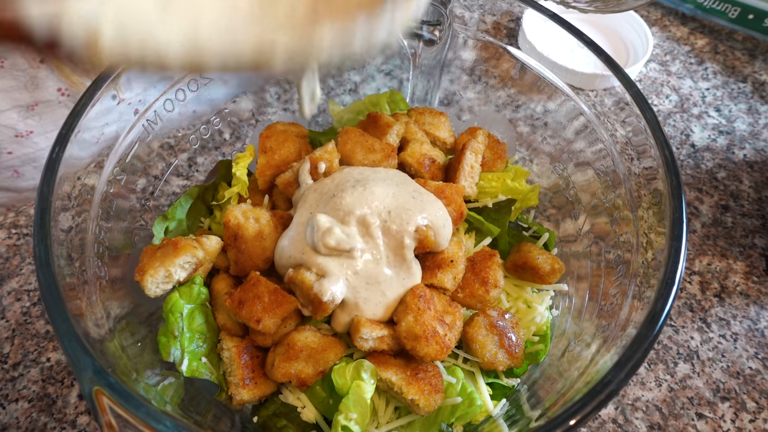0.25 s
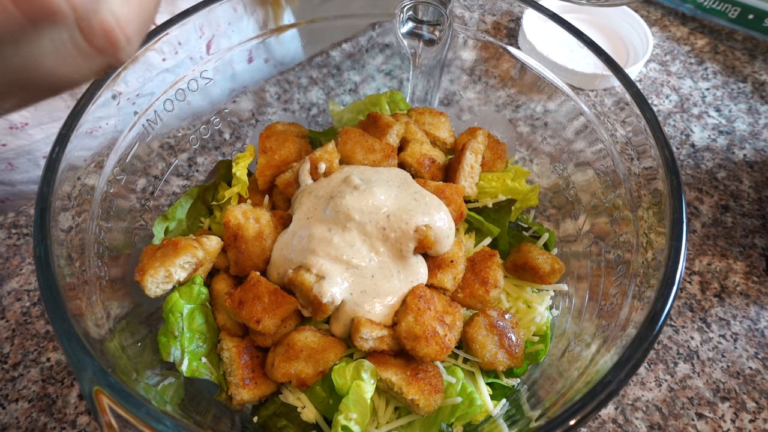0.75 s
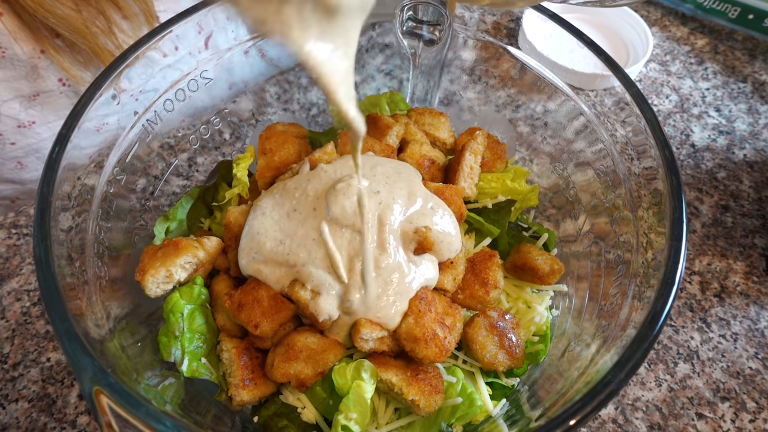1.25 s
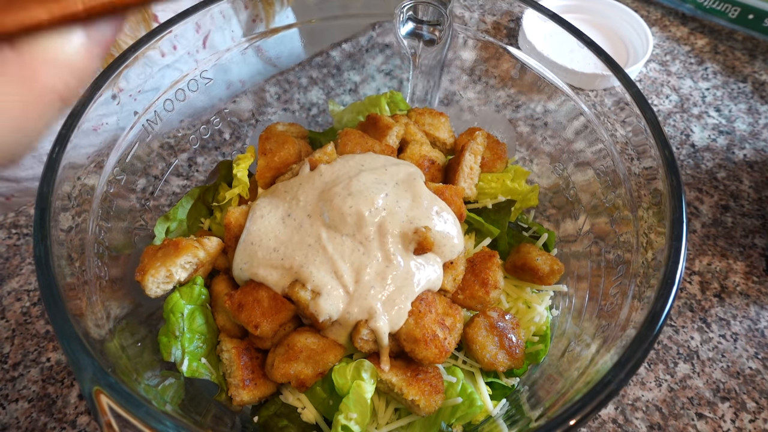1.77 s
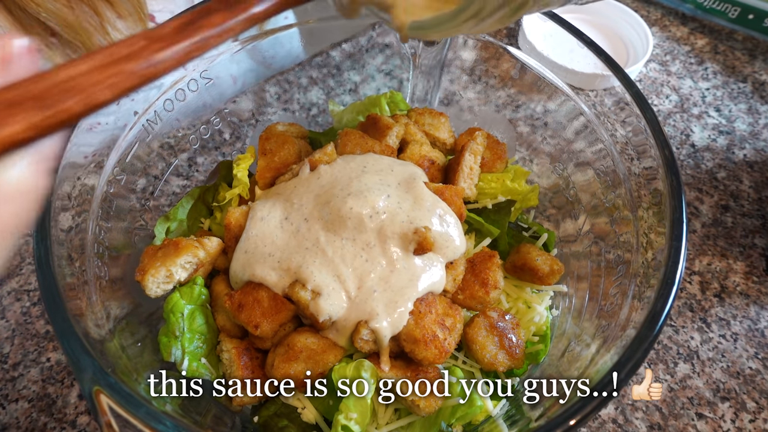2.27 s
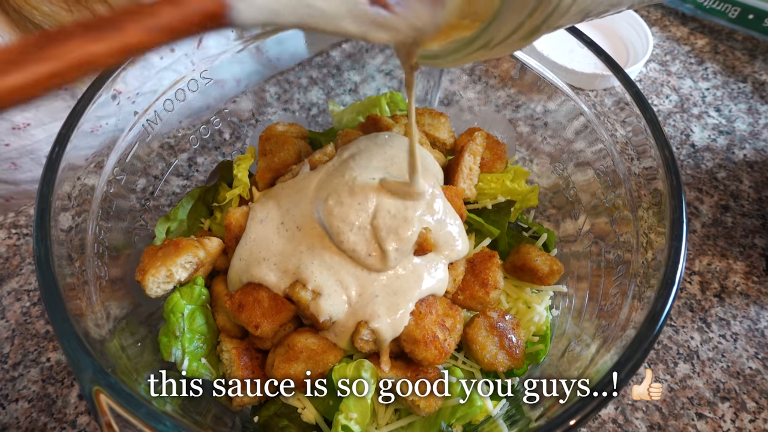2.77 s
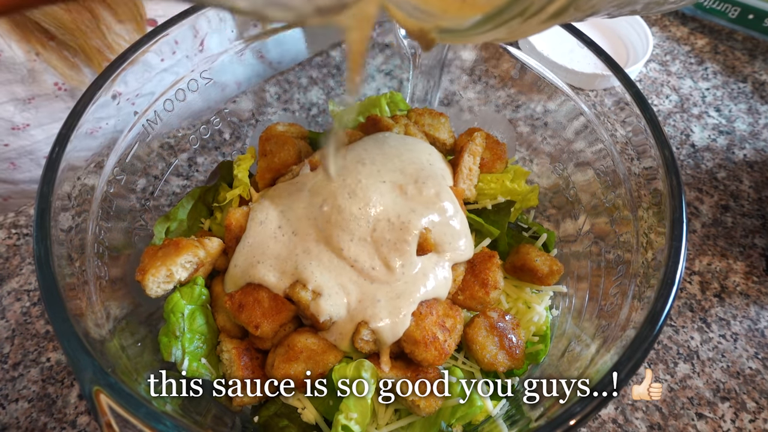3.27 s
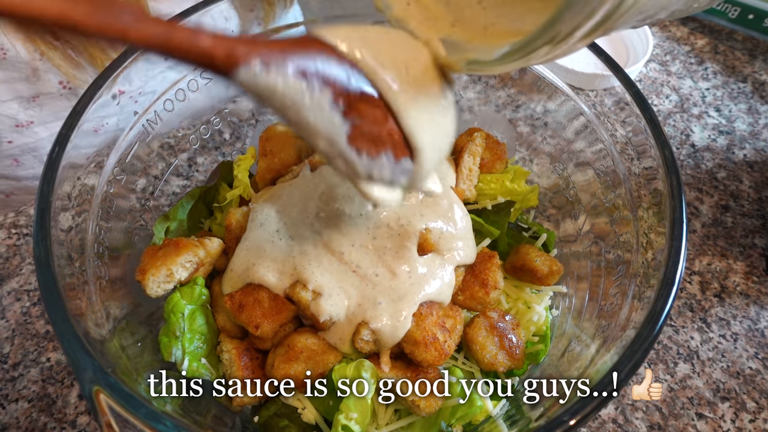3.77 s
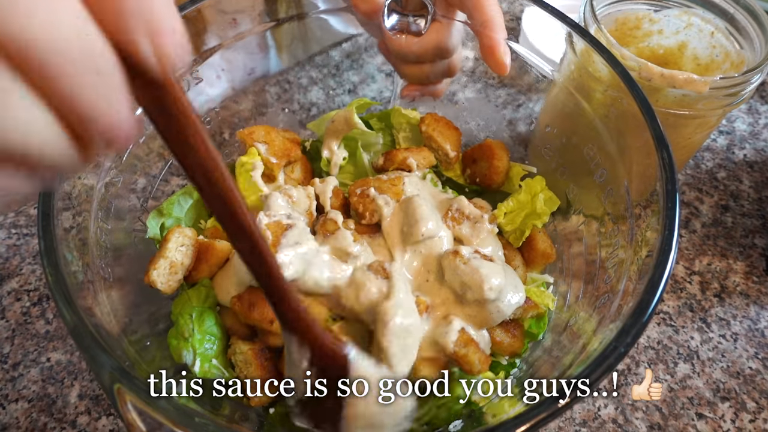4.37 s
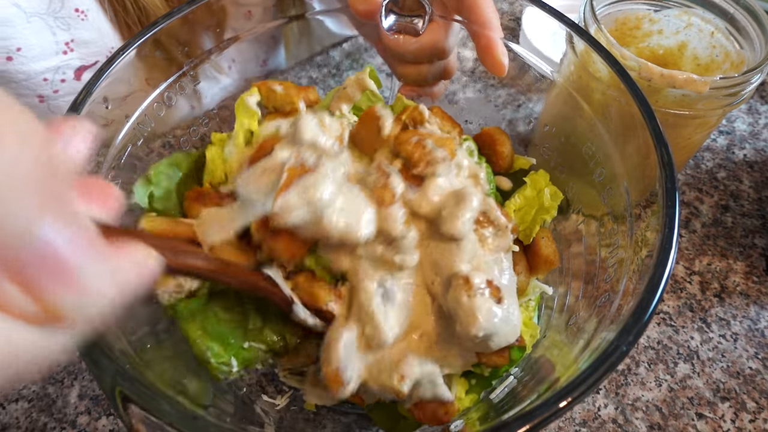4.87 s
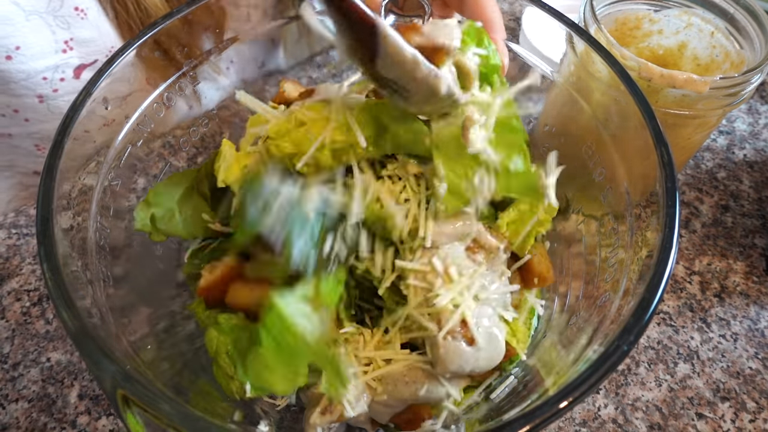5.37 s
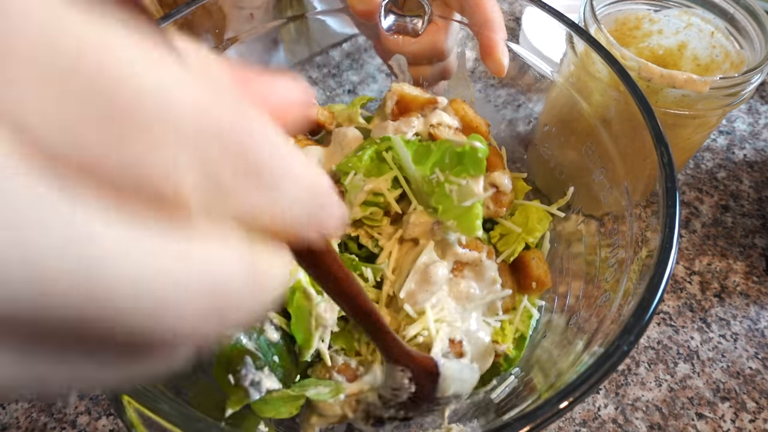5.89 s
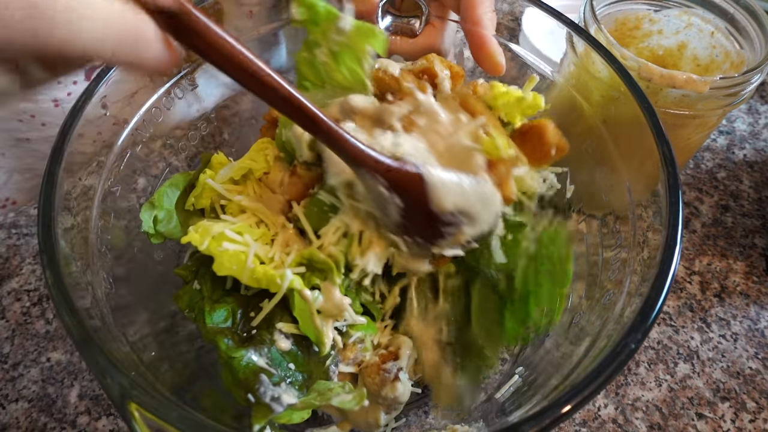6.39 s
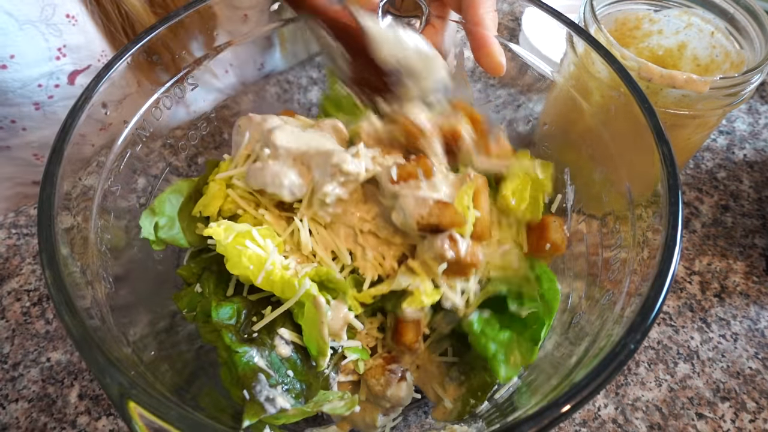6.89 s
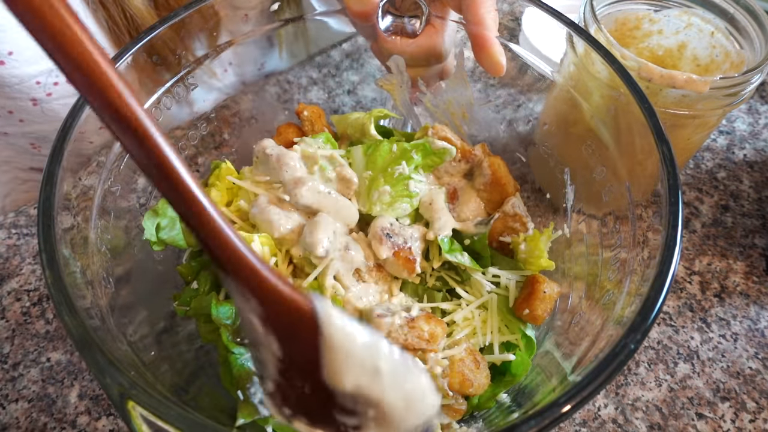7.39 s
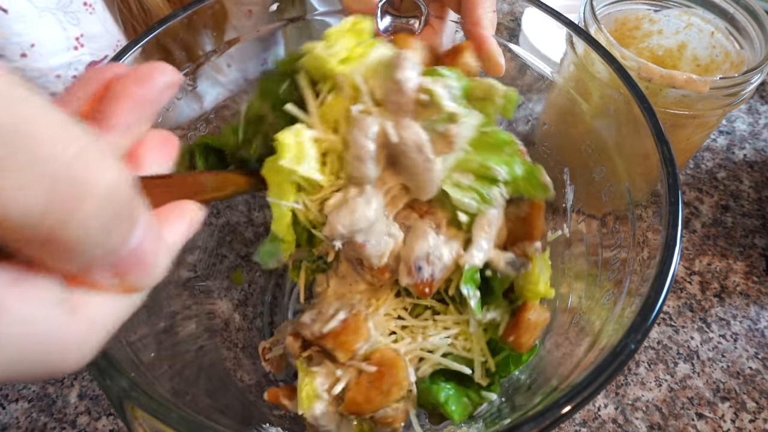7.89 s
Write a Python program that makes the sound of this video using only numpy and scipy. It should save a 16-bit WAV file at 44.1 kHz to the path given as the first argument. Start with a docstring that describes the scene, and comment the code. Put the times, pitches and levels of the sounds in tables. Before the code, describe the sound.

A wooden spoon taps and scrapes a jar over a soft fan hum, then crisp lettuce and croutons are tossed crunchily in a glass bowl.

```python
"""A small kitchen with a humming fan, heard in stereo from just above a glass salad bowl.
A wooden spoon knocks on the rim, taps and scrapes dressing out of a jar, then tosses lettuce and croutons.
Leaves are dense ringing grains, snaps and smacks are bursts of tiny cracks, wet squeaks are rough chirps.
Knocks, taps and the rim are decaying modes; the fan is coloured noise with hums and narrow hiss bands."""
import sys
import numpy as np
from scipy import signal
from scipy.fft import rfft, irfft
from scipy.io import wavfile

SR = 44100
rng = np.random.default_rng(int(sys.argv[2]) if len(sys.argv) > 2 else 0)


def int16_out(signal):
    """Quantize to a 16-bit WAV file."""
    q = np.round(np.clip(np.atleast_2d(signal).T, -1, 1) * 32767)
    wavfile.write(sys.argv[1], SR, q.astype(np.int16))


N = 358974

# colour of cracking ribs, crust and wet films: f/Hz, level/dB
CRACK_COLOUR = [(100, -20), (400, 8), (4000, 1), (8200, 1.5), (9500, -4), (15500, -13)]
# a gesture starts this far below its top; a stopped spoon or finger dies away this fast
SWELL_DB, STOP_DB_PER_S = 10, 403


def salad(click_db=-8):
    """Dressed leaves rub and crackle among tiny clicks; they catch and let go, so the grains come in clumps."""
    # dull rubbing of leaf on leaf: f/Hz, level/dB
    rub_colour = [(60, -55), (200, -6.5), (400, -16), (560, -2.5), (900, 1.5), (1200, -4.5), (1750, -2),
                  (2400, -6.5), (3500, -6.5), (6000, -25), (15000, -38)]
    # bright crackle of crisp leaves: f/Hz, level/dB
    crisp_colour = [(200, -54), (1200, -16.5), (2200, 3.5), (3200, 4.5), (4800, 5), (6200, 1.5), (7900, -2),
                    (9200, -8.5), (12000, -16.5), (15500, -30)]
    clumps = undb(2 * walk(110) + 1.1 * walk(35))
    clicks = level(pops(1500, 1.3), click_db)
    rub_grains = crackle(rate=4800, spread_db=3.5, cycles=4.2, patchy_db=2.5)
    rub = colour(rub_grains + clicks, rub_colour) * undb(0.69 * walk(170))
    crisp_grains = crackle(rate=7000, spread_db=2.5, cycles=8.9, patchy_db=4.5)
    crisp = colour(crisp_grains + clicks, crisp_colour)
    rubbing = level(rub * clumps, 3.86) * tossing(axis=0)
    return rubbing + level(crisp * clumps, 3.44) * tossing(axis=1)


def tossing(axis):
    """Gain of the rubbing (axis 0) or the crisp crackle (axis 1) as the spoon pushes and the leaves fall back."""
    # spoon pushing through the salad: t/s, length/s, swell/s, rubbing gain/dB, crackle gain/dB
    strokes = [(3.961, 0.076, .03, -41, -40), (4.039, .15, .02, -45, -45), (4.413, .11, 0.08, -33.5, -35.5),
               (4.538, .08, .02, -44, -41), (4.643, 0.091, 0.018, -33.5, -34),
               (4.976, 0.03, 0.021, -35, -38.5), (5.443, 0.19, 0.06, -37, -41),
               (5.913, 0.057, 0.013, -39.5, -38), (6.036, 0.11, 0.068, -35.5, -40),
               (6.912, 0.28, 0.038, -38.5, -40.5), (7.496, .15, 0.044, -43, -41),
               (7.68, 0.086, .04, -34.5, -36.5), (7.815, 0.067, 0.022, -37, -38.5)]
    # lifted leaves tumbling back: t/s, length/s, rubbing gain/dB, crackle gain/dB, settling/dB per s
    tumbles = [(4.186, .02, -61, -53.5, 64), (4.763, 0.39, -44.5, -48.5, 30),
               (5.653, 0.056, -58, -53.5, 174), (5.963, .06, -52, -55, 60), (6.149, .09, -40.5, -45, 26.5),
               (7.187, 0.04, -50, -51.5, 51), (7.746, 0.05, -37.5, -40.5, 64),
               (7.88, 0.035, -43, -45.5, 24)]
    tumble_swell_s = 0.041
    pushes = [(s, length, swell_s, dbs[axis], STOP_DB_PER_S) for s, length, swell_s, *dbs in strokes]
    falls = [(s, length, tumble_swell_s, dbs[axis], settling) for s, length, *dbs, settling in tumbles]
    return gates(pushes + falls)


def crumbs(rate=45, spread_db=2.8, snap_hz=2800, snap_db=-4):
    """Lesser ribs and crusts snap at random (rate per s) for as long as the salad moves."""
    snaps = signal.fftconvolve(pops(rate, spread_db), crack(.02, decay_s=0.0013))[:N]
    return level(resonate(snaps, snap_hz, snap_hz * 2), snap_db) * tossing(axis=1)


def rib_snaps():
    """Leaf ribs, crust and sticky dressing give way in sharp runs of tiny fractures."""
    # snaps close to the microphone: t/s, peak level/dB, centre f/Hz, length scale/s
    snaps = [(0.688, -20.5, 4900, 0.0034), (4.167, -20, 4440, 0.019), (4.414, -27.5, 2960, 0.00063),
             (4.517, -14, 3150, 0.0077), (4.534, -19, 4120, 0.0025), (4.596, -24, 4530, 0.0016),
             (4.855, -18, 1990, .0047), (5.46, -18, 3030, 0.0021), (5.509, -11.5, 5430, .0043),
             (5.538, -13, 3070, .019), (5.646, -16.5, 2580, 0.0042), (5.844, -23, 4350, 0.0055),
             (5.916, -20.5, 3850, 0.0052), (5.93, -14, 4050, 0.011), (6.322, -23.5, 2560, 0.0099),
             (6.398, -21, 2780, 0.0074), (6.695, -26.5, 3900, 0.0058), (6.921, -15.5, 4850, 0.003),
             (7.01, -8, 4640, 0.0032), (7.021, -9.5, 5300, 0.0063), (7.17, -32, 3070, .012),
             (7.192, -16.5, 3580, 0.005), (7.489, -25, 5040, 0.01), (7.564, -23, 4050, 0.016),
             (7.752, -7.5, 3260, 0.0024), (8.116, -24.5, 3850, 0.0074)]
    return bursts(snaps, breadth=0.95, decay_share=0.51)


def squeaks(rasp=0.15):
    """A wet leaf slips on the glass by very fast stick-slip: a rough chirp that rises as the leaf lets go."""
    # slips, ahead of their colouring: t/s, peak level/dB, length/s
    slips = [(4.661, -24, .007), (4.67, -29, .004), (5.534, -23, 0.0065), (5.547, -22, 0.0067),
             (7.018, -17, 0.0045), (7.04, -20.5, 0.0038), (7.546, -8, 0.002)]
    start_hz, end_hz = 6220, 8440
    out = np.zeros(N)
    for s, db, length in slips:
        size = int(length * SR)
        roughness = 1 + rasp * rng.standard_normal(size)
        hz = np.linspace(start_hz, end_hz, size) * roughness
        chirp = np.sin(2 * np.pi * np.cumsum(hz) / SR)
        add(out, s, chirp * signal.windows.tukey(size), db)
    return colour(out, CRACK_COLOUR)


def knocks(click_db=-14):
    """Croutons and spoon knock drily on the bowl, damped at once by the salad lying on the glass."""
    # knocks in the bowl: t/s, peak level/dB of the first blow, number of blows
    blows = [(3.996, -25, 1), (4.018, -19, 3), (4.566, -14.5, 1), (4.577, -15.5, 1), (4.682, -17.5, 3),
             (4.751, -16, 1), (4.802, -19.5, 1), (5.028, -24.5, 1), (5.254, -26, 1), (5.311, -26.5, 1),
             (6.076, -18.5, 1), (6.153, -20.5, 1), (6.468, -24.5, 1), (6.514, -30, 1), (6.576, -25, 1),
             (6.983, -17, 1), (7.072, -18.5, 1), (7.819, -12.5, 3), (7.840, -10, 4), (7.887, -19.5, 1)]
    # loaded bowl, before each blow scatters it: f/Hz, level/dB, t60/s
    bowl_modes = [(600, -11.5, 0.018), (806, -3, 0.021), (903, -2, 0.024), (1497, -2, 0.016),
                  (1720, -1.5, 0.021), (2610, -3.5, 0.0081), (3705, -4.5, 0.013), (4730, -2.5, 0.0021)]
    # a catching spoon skips on at this interval, each blow a little weaker
    skip_s, skip_db = .0062, -1.75
    out = np.zeros(N)
    for start, first_db, count in blows:
        for k in range(round(count)):
            s, db = start + k * skip_s, first_db + k * skip_db
            add(out, s, ring(bowl_modes, .05, scatter=0.093), db)
            add(out, s, crack(.03, decay_s=0.00047), db + click_db)
    return out


def jar():
    """Taps and juddering scrapes ring the same short modes; dressing hisses under the spoon."""
    # spoon on the jar: t/s, peak level/dB, contact hardness/dB (mode tilt per decade and crack gain)
    taps = [(1.816, -35.5, -12), (2.214, -27.5, -35), (2.247, -33, -35), (2.427, -33, 12), (2.536, -31, -5),
            (2.555, -23, -1), (2.575, -24, 14), (2.859, -22.5, -1.5), (3.081, -23, 8), (3.092, -15.5, -12),
            (3.098, -19, -7), (3.112, -29, 11), (3.401, -22, -4.5), (3.501, -16, -20), (3.516, -23, 11),
            (3.526, -18, 4), (3.740, -11.5, 16.5)]
    # spoon and hand-held jar, before each blow scatters them: f/Hz, level/dB, t60/s
    jar_modes = [(741, 0, 0.013), (792.5, -1, 0.023), (1959, -10, 0.019), (2040, -9, 0.021),
                 (3130, -18.5, 0.0048), (4480, -23.5, 0.022), (4900, -21.5, 0.0086), (6770, -29, 0.0075)]
    # wet hiss of smeared dressing: f/Hz, level/dB
    smear_colour = [(1000, -34), (1800, 5.5), (2500, 0.5), (3400, 4.5), (4200, 0), (5700, -2.5),
                    (7500, -10), (10000, -19.5), (15500, -45)]
    out = np.zeros(N)
    for s, db, hard_db in taps:
        add(out, s, ring(jar_modes, .08, scatter=0.031, tilt_db=hard_db), db)
        add(out, s, crack(.03, decay_s=0.0026), db - 27 + hard_db)
    soft_blow = ring(jar_modes, .08, scatter=.005, tilt_db=-9)
    judder = signal.fftconvolve(pops(900, 3.5), soft_blow)[:N]
    wet_grains = crackle(rate=8000, spread_db=-1.5, cycles=23, patchy_db=3)
    smear = colour(wet_grains, smear_colour) * undb(2.8 * walk(100))
    return out + level(judder, 3.8) * scraping(axis=0) + level(smear, 2.2) * scraping(axis=1)


def scraping(axis):
    """Gain of the judder (axis 0) or the wet hiss (axis 1) while the spoon drags along the jar."""
    # drags along the jar: t/s, length/s, swell/s, glass judder gain/dB, wet hiss gain/dB
    scrapes = [(2.37, 0.16, 0.13, -55, -57.5), (2.931, .15, 0.087, -52, -50),
               (3.454, 0.062, 0.038, -43, -51), (3.736, 0.13, 0.015, -39.5, -47.5)]
    return gates([(s, length, swell_s, dbs[axis], STOP_DB_PER_S) for s, length, swell_s, *dbs in scrapes])


def rim(rattle_db=-10, rattle_hz=520, rattle_decay_s=0.092):
    """Wood on the rim: a dull thud, then the glass sings on and its foot chatters on the counter."""
    # spoon on the rim: t/s, ring peak level/dB, thud peak level/dB
    rim_hits = [(0.0, -23, -42), (1.542, -32.5, -10.5)]
    # free rim, before each blow scatters it: f/Hz, level/dB, t60/s
    rim_modes = [(634, -3, 0.52), (686.5, 2.5, 0.51), (1535, 1, 0.64), (2660, -11, 0.34), (3160, -23, 0.41),
                 (4070, -25, .3)]
    # spoon and counter under a rim hit, before scatter: f/Hz, level/dB, t60/s
    thud_modes = [(300, -14.5, 0.081), (435, -5.5, 0.071), (630, -3.5, 0.036), (763, 4, 0.041),
                  (930, -1, 0.012), (2070, -12, 0.025), (3210, -35.5, 0.23), (5100, -15, 0.0035)]
    out = np.zeros(N)
    for s, ring_db, thud_db in rim_hits:
        add(out, s, ring(rim_modes, .7, scatter=0.0001), ring_db)
        add(out, s, ring(thud_modes, .15, scatter=0.0287), thud_db)
        chatter = resonate(crack(0.3, rattle_decay_s), rattle_hz, rattle_hz)
        add(out, s, chatter, ring_db + rattle_db)
    return out


def smacks():
    """Dressing smacks under the spoon and hands bump the bowl, each as a run of tiny cracks."""
    # smacks and bumps: t/s, peak level/dB, centre f/Hz, length scale/s
    smack_table = [(0.702, -39, 3500, .004), (0.75, -48.5, 3900, 0.11), (1.655, -35, 3100, 0.0035),
                   (1.71, -43.5, 2430, 0.073), (2.520, -35.5, 2100, 0.022), (2.554, -25.5, 1620, 0.01),
                   (2.575, -30, 2460, .0042), (2.968, -39, 3370, 0.0059), (3.094, -22.5, 3000, 0.0082),
                   (3.503, -19, 3320, 0.0037), (5.846, -40, 690, 0.035), (7.446, -34, 407, 0.017)]
    return bursts(smack_table, breadth=0.6, decay_share=0.9)


def fingers(hz=5400, width_hz=700):
    """Skin sliding along the smooth wooden spoon handle gives a soft, narrow hiss."""
    # slides along the handle: t/s, length/s, swell/s, level/dB
    slides = [(0.925, .42, .02, -70.5), (7.27, 0.23, 0.21, -50.5)]
    hiss = resonate(resonate(rng.standard_normal(N), hz, width_hz), hz, width_hz)
    return level(hiss) * gates([(*slide, STOP_DB_PER_S) for slide in slides])


def room(x, treble_hz=4000, alike=0.28, t60_s=0.4):
    """Counter and walls return a short, dull tail, partly unrelated between the sides."""
    t = seconds(.5)
    # the first return comes 3 ms after the direct sound
    tails = rng.standard_normal((3, len(t))) * undb(-60 * t / t60_s) * (t > .003)
    tails = signal.lfilter(*signal.butter(1, min(treble_hz, SR / 3), fs=SR), tails)
    pair = tails[:2] + 2 * alike * tails[2]
    return np.array([signal.fftconvolve(x, h / np.linalg.norm(h))[:N] for h in pair])


def kitchen(air_db=-52.5):
    """Steady fan air as coloured noise with its hum and whine, spread around the room."""
    # fan air in the room: f/Hz, level/dB
    air_colour = [(18, -74), (30, -48), (43, -28.5), (124, -15), (189, -7), (239, -10.5), (273, -5),
                  (336, -17), (540, -14.5), (913, -23), (1430, -21), (2680, -28.5), (5310, -39.5),
                  (6210, -42), (16000, -50)]
    # air diffuse in the mids, alike on both sides in the bass: f/Hz, side minus mid level/dB
    air_spread = [(60, -19), (260, -15), (430, -9), (900, -2), (1900, -1), (3000, -3.5), (7000, 0),
                  (10500, -2), (15000, -14)]
    # hiss bands of the fan motor: f/Hz, width/Hz, rms level/dB
    motor_bands = [(4750, 570, -73.5), (7630, 130, -83.5), (9300, 250, -83.5)]
    # low hum and fan-blade hum: f/Hz, rms level/dB, wobble/dB
    hum_tones = [(58, -86, 0), (277.4, -58, 3.5)]
    mid, side = (level(colour(rng.standard_normal(N), air_colour), air_db) for _ in range(2))
    whine = np.zeros(N)
    for hz, width, db in motor_bands:
        band = resonate(resonate(rng.standard_normal(N), hz, width), hz, width)
        whine += level(band, db)
    t = np.arange(N) / SR
    hum = np.zeros(N)
    for hz, db, wobble_db in hum_tones:
        tone = np.sin(2 * np.pi * hz * t + .5 * walk(5.7))
        hum += level(tone * undb(wobble_db * walk(5.7)), db)
    return mid + whine + hum + colour(side, air_spread) * np.array([[1], [-1]])


def undb(db):
    """Decibels to gain."""
    return 10 ** (np.asarray(db) / 20)


def level(x, db=0):
    """Scale to an rms level."""
    return x * undb(db) / np.sqrt(np.mean(x ** 2))


def add(out, s, x, db):
    """Mix a short sound in at time s with the given peak level."""
    i = max(int(s * SR), 0)
    out[i:i + len(x)] += (x * undb(db) / np.abs(x).max())[:N - i]


def seconds(length):
    """Time axis of a short sound."""
    return np.arange(int(length * SR)) / SR


def colour(x, points):
    """Causal filter through (Hz, dB) points, built from the cepstrum."""
    hz, db = np.transpose(points)
    size = 4096
    grid_hz = np.fft.rfftfreq(size, 1 / SR) + 1
    gain = undb(np.interp(np.log(grid_hz), np.log(hz), db))
    cepstrum = irfft(np.log(gain))
    # folding the cepstrum forward in time gives minimum phase
    cepstrum[1:size // 2] *= 2
    cepstrum[size // 2 + 1:] = 0
    return signal.fftconvolve(x, irfft(np.exp(rfft(cepstrum))))[:len(x)]


def resonate(x, hz, width):
    """Two-pole band-pass."""
    hz = min(hz, .45 * SR)
    return signal.lfilter(*signal.iirpeak(hz, hz / min(width, SR / 4), fs=SR), x)


def walk(rate):
    """Smooth random wander through knots of unit spread, rate knots per second."""
    knots = rng.standard_normal(N // 10)
    return np.interp(np.arange(N) / SR * rate, np.arange(len(knots)), knots)


def gates(gestures):
    """Gain of gestures (s, length s, swell s, dB, fall dB per s): each swells, holds and dies away."""
    t = np.arange(N) / SR
    power = np.zeros(N)
    for s, length, swell_s, db, fall_db_per_s in gestures:
        age = t[t >= s] - s
        swell_db = SWELL_DB * np.maximum(1 - age / swell_s, 0)
        fall_db = fall_db_per_s * np.maximum(age - length, 0)
        power[t >= s] += undb(db - swell_db - fall_db) ** 2
    return np.sqrt(power)


def ring(modes, length, scatter, tilt_db=0):
    """Decaying modes; each blow lands elsewhere and shifts them, a hard one favours the high ones (dB per decade)."""
    t = seconds(length)
    chance = rng.standard_normal((len(modes), 2))
    out = np.zeros(len(t))
    for k, (hz, db, t60) in enumerate(modes):
        gain = (-1) ** k * undb(db + tilt_db * np.log10(hz) + chance[k, 0])
        shifted_hz = hz * (1 + scatter * chance[k, 1])
        out += gain * undb(-60 * t / t60) * np.sin(2 * np.pi * shifted_hz * t)
    return out


def crack(length, decay_s, rise_s=.0001):
    """A burst of tiny fractures that builds up and dies away."""
    t = seconds(length)
    envelope = np.exp(-t / decay_s) * np.tanh(t / rise_s)
    return colour(rng.standard_normal(len(t)) * envelope, CRACK_COLOUR)


def bursts(table, breadth, decay_share, rise_share=0.27):
    """A rib breaks or a wet film parts: a short run of tiny cracks around one pitch."""
    out = np.zeros(N)
    for s, db, hz, length in table:
        cracks = crack(0.26, length * decay_share, length * rise_share)
        add(out, s, resonate(resonate(cracks, hz, hz * breadth), hz, hz * 2), db)
    return out


def pops(rate, spread_db):
    """Random impulses of either sign, rate per second, with exponentially spread levels in dB."""
    draw = rng.random(N) * SR / rate
    hits = np.flatnonzero(draw < 1)
    out = np.zeros(N)
    out[hits] = (-1.) ** hits * undb(spread_db * np.minimum(-np.log(draw[hits]), 4))
    return out


def crackle(rate, spread_db, cycles, patchy_db):
    """Grains that ring a few cycles; the level of each pitch comes and goes on its own."""
    pitches = np.geomspace(350, 15000, 32)
    out = np.zeros(N)
    for hz in pitches:
        grains = pops(rate / len(pitches), spread_db) * undb(patchy_db * walk(45))
        out += resonate(grains, hz, hz / cycles)
    return level(out)


def small_body(x, corner_hz):
    """Small things radiate little below their first mode."""
    return signal.sosfilt(signal.butter(2, corner_hz, "high", fs=SR, output="sos"), x)


def scene(near_db=-0.14, bowl_db=-22, room_db=-20):
    """Bowl and jar sit close, a little to the right; the curved glass throws the crackle unevenly to the two sides."""
    # left microphone facing away from the bowl: f/Hz, level/dB
    left_shade = [(60, 0), (250, -.3), (420, -2.5), (650, -1.7), (1300, -3.1), (2400, -1.8), (3800, -3.3),
                  (6500, -3.7), (8200, -2.6), (10000, -.3), (15000, .6)]
    leaves = salad() + crumbs() + rib_snaps() + squeaks()
    hands = smacks() + fingers()
    glass = small_body(knocks() + jar(), corner_hz=358) + small_body(rim(), corner_hz=200)
    near = leaves + hands + glass
    t = seconds(0.018)
    echoes = rng.standard_normal(len(t)) * np.exp(-t / 0.012)
    thrown = signal.fftconvolve(small_body(leaves, corner_hz=2000), echoes / np.linalg.norm(echoes))[:N]
    side = undb(bowl_db) * thrown
    direct = np.array([colour(near, left_shade) + side, near - side])
    return undb(near_db) * direct + undb(room_db) * room(near) + kitchen()


def record(dry, bass_hz=50, top_hz=15600):
    """The microphone drops the deep bass and cuts the top."""
    thin = signal.sosfilt(signal.butter(4, bass_hz, "high", fs=SR, output="sos"), dry)
    return signal.sosfilt(signal.ellip(8, .2, 70, top_hz, fs=SR, output="sos"), thin)


dry = scene()
out = record(dry)
int16_out(out)
```